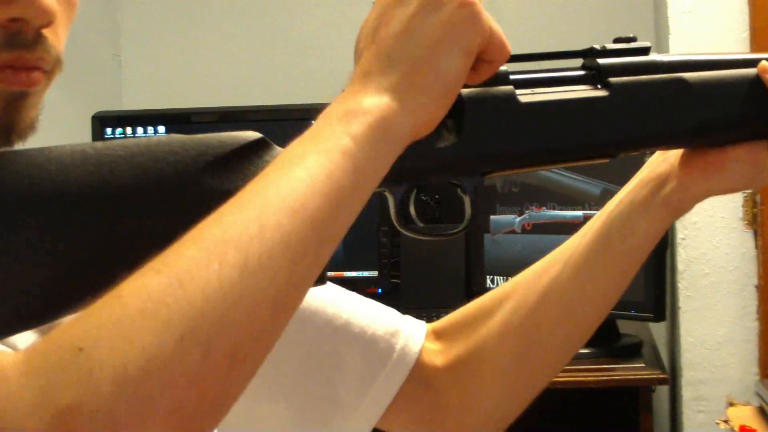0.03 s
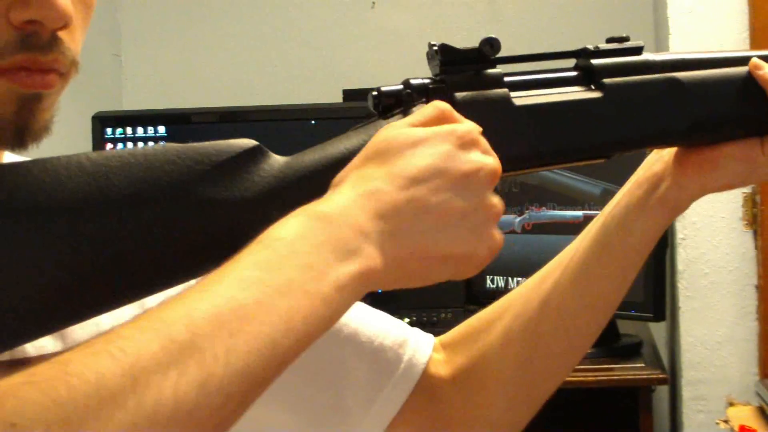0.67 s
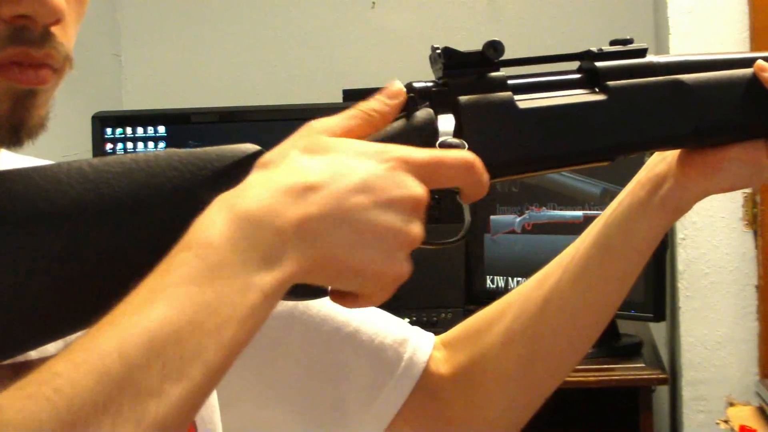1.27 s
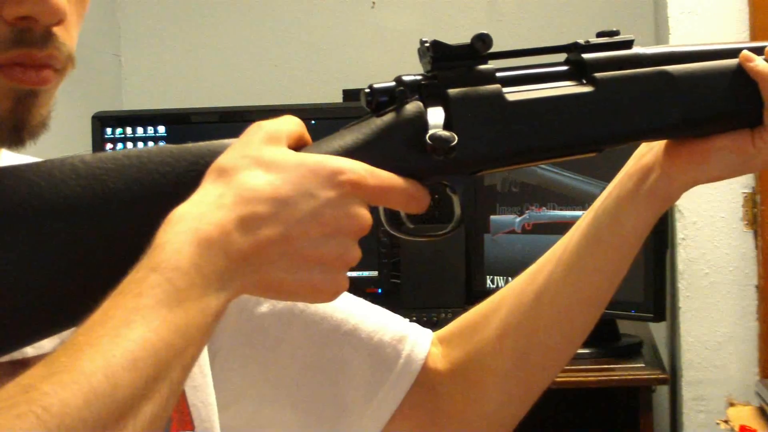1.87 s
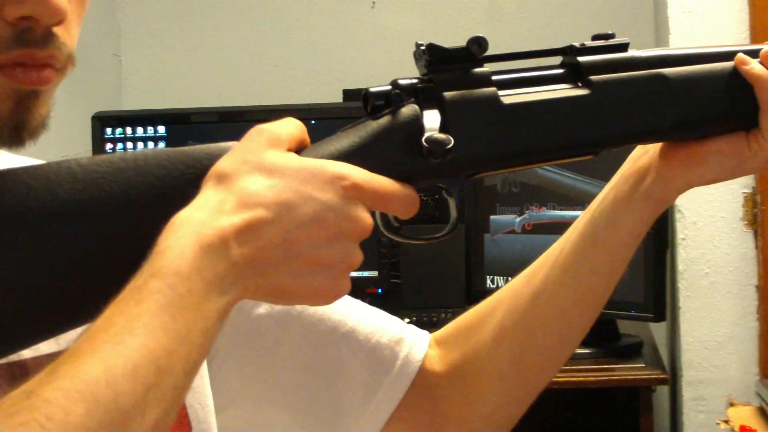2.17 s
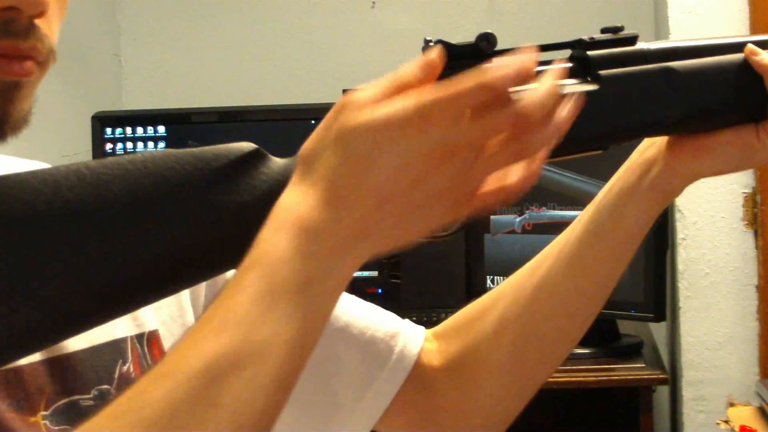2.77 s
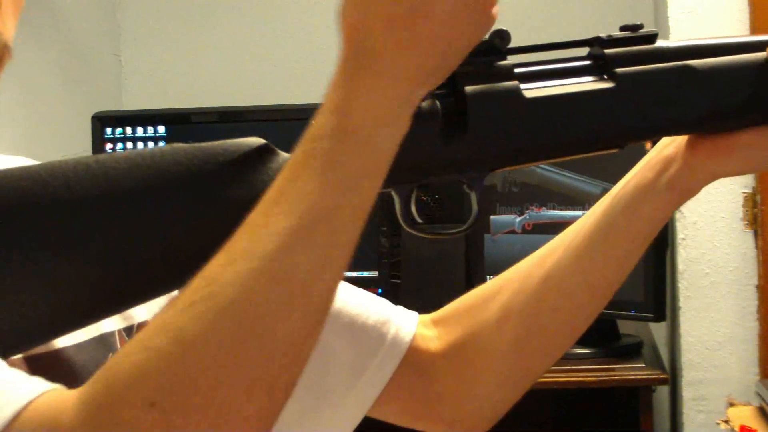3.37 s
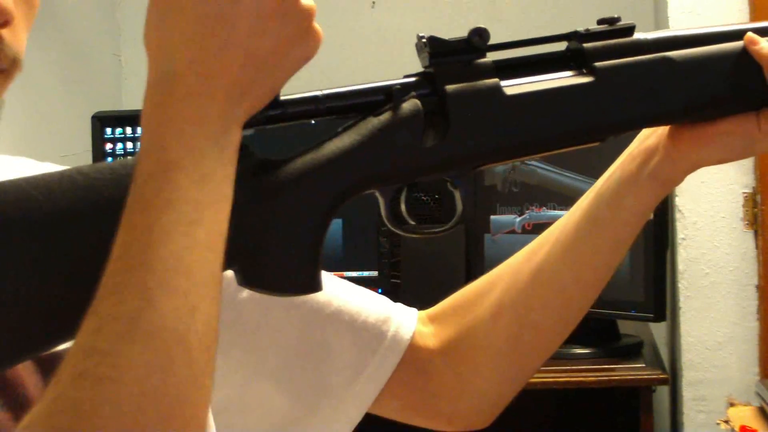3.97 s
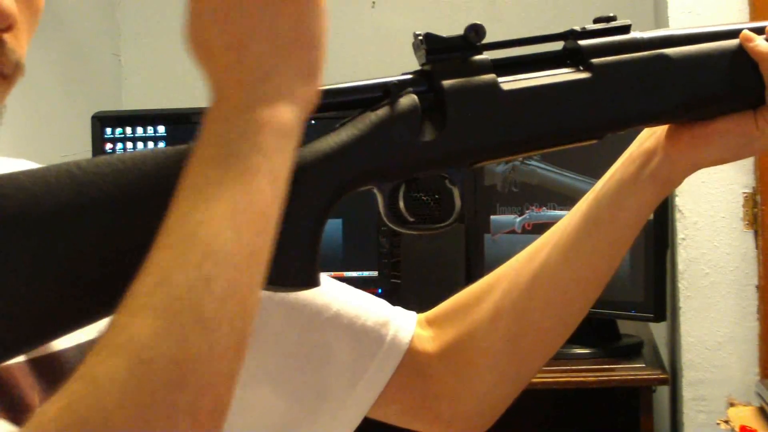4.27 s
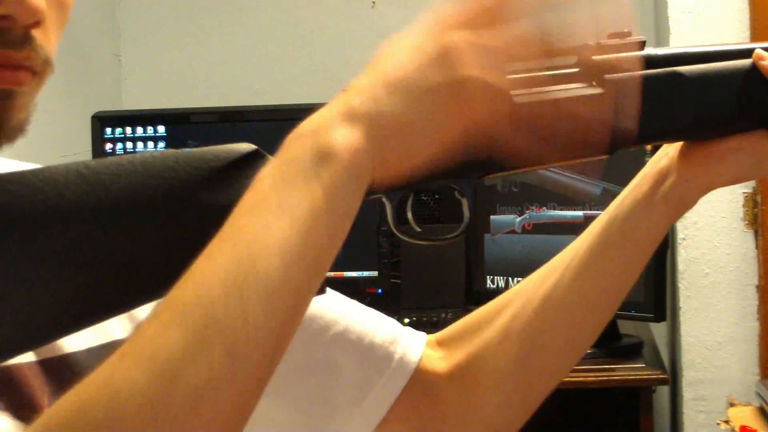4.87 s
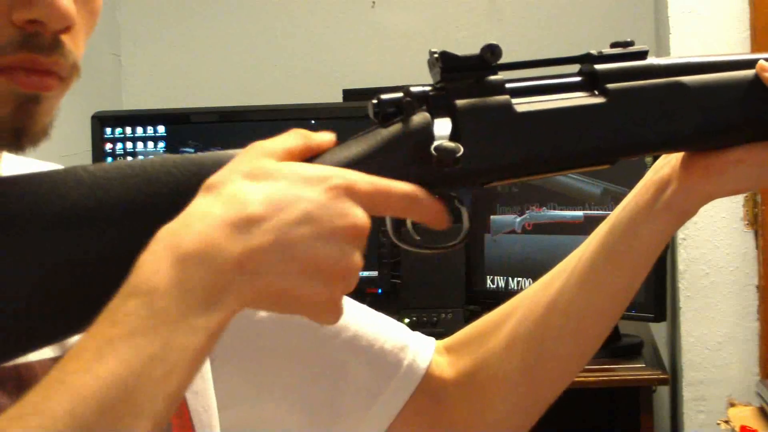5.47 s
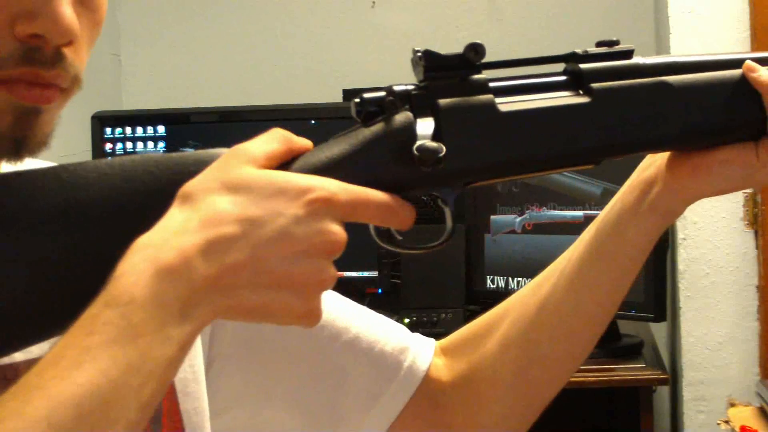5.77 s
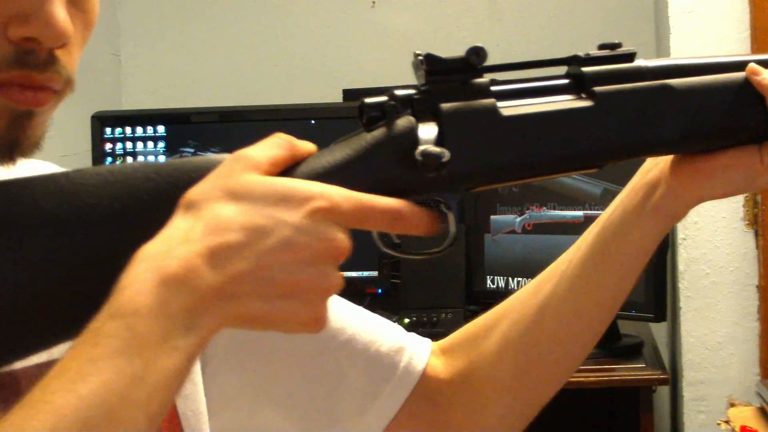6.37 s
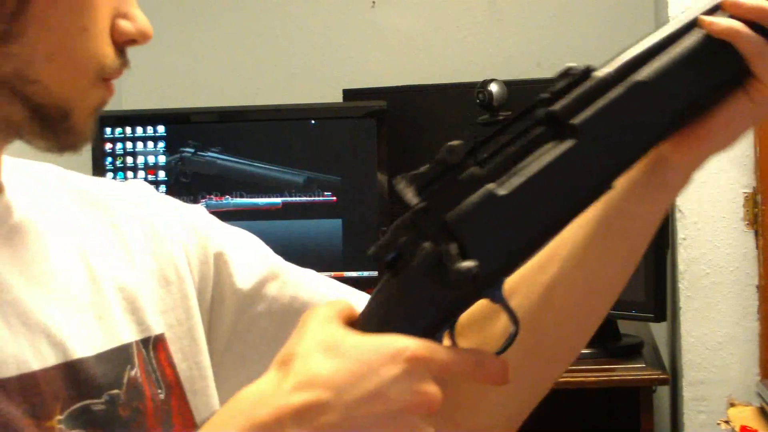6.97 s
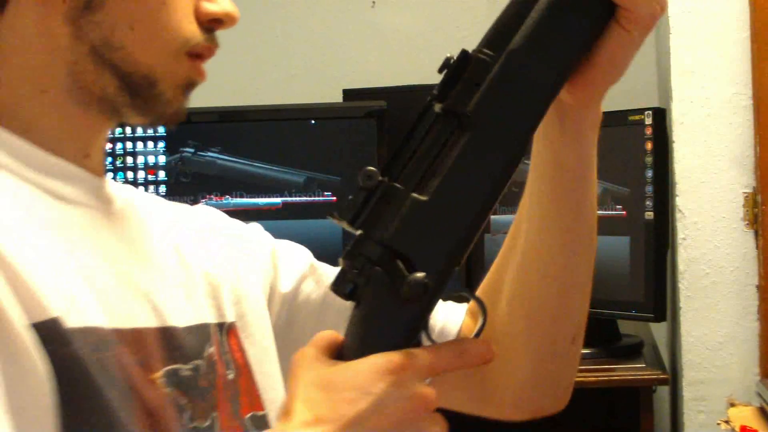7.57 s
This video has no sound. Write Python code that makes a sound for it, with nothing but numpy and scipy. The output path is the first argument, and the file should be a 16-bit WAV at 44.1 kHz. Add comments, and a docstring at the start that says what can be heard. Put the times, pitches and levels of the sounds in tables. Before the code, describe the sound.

In a small room with close walls, a toy rifle is cocked and dry-fired twice. Each time the bolt scrapes briefly and clacks against its stops, loose parts tick, and after a short wait the piston snaps home. A soft low thud comes near the end. Every hit rings briefly over a steady low fan rush and hum, and the microphone cuts off the highest treble.

```python
"""A bolt-action airsoft rifle, cocked and dry-fired twice in a small room with close walls.
The bolt slides and clacks, the sear slips and the piston snaps home; loose parts tick in between.
Each contact sets off ringing tones of the rifle and the room. Near the end the stock bumps softly.
A fan and mains hum lie underneath, all heard through one narrow-band microphone
whose limiter ducks after each hard hit."""
import sys
import numpy as np
from scipy import signal
from scipy.fft import rfft, irfft, next_fast_len
from scipy.io import wavfile
from scipy.ndimage import uniform_filter1d

SR = 44100
rng = np.random.default_rng(int(sys.argv[2]) if len(sys.argv) > 2 else 0)


def waveform_to_disk(signal):
    """Save audio, clipped to [-1, 1], as 16-bit WAV at the path in sys.argv[1]."""
    frames = np.transpose(np.atleast_2d(signal))
    scaled = np.clip(frames, -1, 1) * 32767
    samples = np.round(scaled).astype(np.int16)
    wavfile.write(sys.argv[1], SR, samples)


N = 340893
TIME = np.arange(N) / SR

# The bolt hitting its stops. Each row: start in seconds, level in dB, knock (lows) in dB,
# brightness (highs) in dB, chatter decay in seconds, the part's own pitch in Hz, its lift in dB.
BOLT_CLACKS = [(0.001, -10.5, -1.5, 2, 0.003, 1720, 4.5), (0.0328, 1.5, -5, -2, 0.0019, 2880, 4.5),
               (0.099, -5.5, -6.5, -6.5, 0.0075, 486, 6), (0.5274, -4.5, -2.5, -10.5, 0.0025, 1600, 3.5),
               (0.6119, 1, -3.5, -0.5, 0.003, 490, 10.5), (3.3059, -4.5, -1, 2, 0.0039, 1690, 2.5),
               (3.634, -4.5, 2.5, -2, .0018, 2680, 8.5), (3.722, -3.5, -4, 2, 0.0029, 1720, 7.5),
               (3.8361, -2.5, -2, 0.5, 0.0036, 1210, 3.5), (4.5262, -7.5, -3, -2, 0.0061, 1140, 5.5),
               (5.0613, -1.5, 0.5, 0.5, 0.0014, 1460, 5)]
def bolt_clacks(rebound_s=0.01, loss_db=16.5, dull_db=8.5, chatter_s=0.0046, part_hz=1300, lift_db=7):
    """The bolt hits its stop, then settles with a weaker, duller rebound."""
    rebounds = [(start + rebound_s, db - loss_db, knock, bright - dull_db, chatter_s, part_hz, lift_db)
                for start, db, knock, bright, *_ in BOLT_CLACKS]
    return list(BOLT_CLACKS) + rebounds


# The trigger pulls. Each row: start in seconds, level in dB, knock in dB, brightness in dB.
DRY_SHOTS = [(2.174, 3.5, -5, 6.5), (6.2062, 3, -13.5, 7)]
def dry_shots(lead_s=0.0048, sear_under_db=24.5, sear_knock_db=5):
    """The sear slips with a small click, then the piston snaps home."""
    part = (0.0028, 4600, 2.5)   # chatter decay in seconds, pitch in Hz, lift in dB
    sears = [(start - lead_s, db - sear_under_db, sear_knock_db, 0, *part) for start, db, *_ in DRY_SHOTS]
    pistons = [(*shot, *part) for shot in DRY_SHOTS]
    return sears + pistons


# Light touches on the rifle. Each row: start in seconds, level in dB, hardness as dB of treble,
# chatter decay in seconds, the part's own pitch in Hz.
PART_TOUCHES = [(0.077, -14, -7, 0.0041, 1000), (0.521, -24.5, -3, 0.0088, 6000),
                (0.595, -22, -7, .0013, 2000), (0.62, -12, 2.5, 0.0066, 2750),
                (0.644, -16.5, -1, 0.0092, 1410), (3.048, -30, -16, 0.016, 600),
                (3.161, -31, 2.5, 0.005, 1100), (3.269, -28, -24, 0.0047, 1700),
                (3.283, -20.5, -16, 0.0071, 1840), (3.418, -30, -2, 0.0027, 1800),
                (3.5509, -17.5, 6, 0.0093, 4050), (3.619, -19, 2, 0.0039, 2700),
                (3.748, -12.5, -5, 0.0062, 490), (4.443, -20, -6, .0081, 980),
                (4.594, -22.5, 4.5, 0.0024, 3320), (4.9185, -18, -12.5, 0.0071, 950),
                (5.041, -18.5, -13, .0018, 1540), (6.446, -34.5, -1, 0.0032, 2610),
                (7.543, -44.5, 23, 0.0088, 4170)]
def loose_parts(knock_db=-1.5, knock_per_hardness=0.36, lift_db=6):
    """Loose parts meet lightly: hard touches tick, soft ones knock."""
    return [(start, db, knock_db - knock_per_hardness * hardness, hardness, chatter_s, hz, lift_db)
            for start, db, hardness, chatter_s, hz in PART_TOUCHES]


def impact(chatter_s, lead_in_db=-15.0, lead_in_s=0.0024, size=4096):
    """A faint, brief swell of noise leads into a click of micro-impacts that excite all pitches evenly."""
    envelope = np.exp(-TIME[:size] / chatter_s)
    chatter = rng.standard_normal(size) * envelope
    for _ in range(4):   # flatten the spectrum while keeping the burst short
        spectrum = rfft(chatter)
        chatter = irfft(spectrum / (np.abs(spectrum) + 1e-12)) * envelope ** (1 / 8)
    click = rms_one(chatter) * np.sqrt(np.mean(envelope ** 2))
    lead_in = from_db(lead_in_db) * rng.standard_normal(size) * np.exp(-(TIME[:size] / lead_in_s) ** 2)
    return np.concatenate([lead_in[::-1], click])   # the click starts at the midpoint


def contacts(events, knock_hz=1200, bright_hz=3500, part_q=5.1):
    """Heavy parts knock, light ones tick; each adds its own short resonance and echoes off the walls."""
    force = np.zeros(N + 2 * SR)   # a spare second at each end
    for start, level_db, knock_db, bright_db, chatter_s, part_hz, lift_db in events:
        low, rest = split(impact(chatter_s), knock_hz)
        mid, high = split(rest, bright_hz)
        click = from_db(knock_db) * low + mid + from_db(bright_db) * high
        click = click + (from_db(lift_db) - 1) * resonance(click, part_hz, part_hz / part_q)
        heard = from_db(level_db) * room(click)
        at = SR + round(start * SR) - len(click) // 2
        force[at:at + len(heard)] += heard
    return force[SR:SR + N]


# The bolt's strokes. Each row: time of full speed in seconds, stop in seconds, friction in dB.
BOLT_STROKES = [(0, 0.095, -26), (3.272, 3.307, -46), (3.61, 3.78, -32.5), (3.801, 3.826, -31),
                (4.464, 4.577, -28.5), (4.915, 4.93, -43.5)]
def stroke_friction_db(swell_db_per_s=328, sag_db_per_s=64, stop_db_per_s=901):
    """Each stroke swells as the bolt gathers speed, sags as it travels and dies when it stops."""
    strokes = []
    for full, stop, db in BOLT_STROKES:
        swell = swell_db_per_s * np.maximum(full - TIME, 0)
        sag = sag_db_per_s * np.maximum(TIME - full, 0)
        halt = stop_db_per_s * np.maximum(TIME - stop, 0)
        strokes.append(db - swell - sag - halt)
    return np.max(strokes, axis=0)


def bolt_slide(slips_per_s=2500, spread_db=5.0, dull_hz=5500, thin_hz=750, tube_db=-14):
    """Friction is a dense run of tiny slips of uneven size, which make the bolt's tube sing."""
    sizes = rng.choice([-1, 1], N) * from_db(spread_db * rng.uniform(-0.63, 1, N))
    slips = (rng.random(N) < slips_per_s / SR) * sizes
    scrape = rms_one(butter(slips, dull_hz, "low", order=1))
    scrape = butter(scrape, thin_hz, "high")
    friction_db = stroke_friction_db()
    # the tube follows only part of the friction's swing, so a light rub mostly sings
    tube_drive = scrape * from_db(tube_db + 0.6 * friction_db)
    return scrape * from_db(friction_db) + resonance(tube_drive, hz=1030, width_hz=120)


# The colour of a contact. Each row: frequency in Hz, gain in dB.
CONTACT_COLOUR = [(100, -19.5), (250, -5), (380, -4), (490, 1), (620, -1.5), (1000, 4), (1700, 4.5),
                  (2600, 2.5), (3500, -0.5), (5000, 0), (6500, 0), (7500, -14)]
# Ringing tones of the rifle and the room. Each row: pitch in Hz, relative level in dB, t60 in seconds.
RINGING_TONES = [(510, -6.5, 0.036), (765, -8, 0.14), (892, -6, 0.065), (950, -1, 0.11), (1027, 1.5, 0.14),
                 (1225, -0.5, .22), (1286, -5, 0.21), (1406, -2, 0.25), (1590, -5.5, 0.22),
                 (1725, -4.5, 0.084), (1924, -7.5, 0.14), (1920, -5.5, 0.15), (2165, -10.5, 0.32),
                 (2540, -14, 0.11), (2608, -6.5, 0.03), (2880, -16.5, .12), (3590, -7, 0.064),
                 (4360, -13.5, .12), (4770, -7, 0.073), (5700, -9, 0.1), (6500, -11.5, .2)]
def crack_and_ring(force, direct_db=4.0, ring_db=7.5):
    """Every contact radiates as a crack and sets off ringing tones of the rifle and the small room."""
    crack = colour(force, CONTACT_COLOUR)
    tones = sum(from_db(db) * resonance(crack, hz, width_hz=np.log(1000) / (np.pi * t60))
                for hz, db, t60 in RINGING_TONES)
    return from_db(direct_db) * crack + from_db(ring_db) * tones


def bolt_handle(level_db=-14):
    """The handle rings as the bolt is first slammed shut."""
    return from_db(level_db) * ring(start=0.613, hz=6455, t60=0.21)


# The stock's bumps. Each row: start in seconds, level in dB, pitch in Hz, t60 in seconds.
STOCK_BUMPS = [(7.0985, -22, 280, 0.097), (7.098, -21, 200, 0.044), (7.1335, -24, 127, .1)]
def stock_bumps():
    """The stock meets the shooter's body with soft, low thuds."""
    return sum(from_db(db) * ring(start, hz, t60) for start, db, hz, t60 in STOCK_BUMPS)


def room(x, echo_db=-3, wall_delay_s=0.005, low_t60=0.26, high_t60=0.27, early_db=11.5, early_s=0.0041):
    """A thin direct crack, then the close walls; their echo pattern is new each time, as the rifle moves."""
    age = TIME[:SR // 3]
    scatter = butter(rng.standard_normal(len(age)), 200, "high")
    low, high = split(scatter, hz=3500)
    tail = low * from_db(-60 * age / low_t60) + high * from_db(-60 * age / high_t60)
    early_lift = 1 + from_db(early_db) * np.exp(-age / early_s)
    echoes = tail * early_lift * (age > wall_delay_s)
    body, crack = split(signal.unit_impulse(len(age)), hz=1400)
    direct = from_db(-2.0) * body + crack
    return signal.fftconvolve(x, direct + from_db(echo_db) * echoes / np.linalg.norm(echoes))


# The fan's air noise in the room. Each row: frequency in Hz, relative spectral level in dB.
FAN_SPECTRUM = [(12, -32), (20, 3.5), (65, -2.5), (87, -3), (109, -9), (210, -4.5), (244, -9), (361, -9),
                (388, -16), (439, -11), (508, -15), (1110, -16), (1530, -20.5), (5900, -25), (7000, -27.5),
                (9100, -96), (15400, -120)]
def fan(level_db=-38, top_hz=7250):
    """Moving air makes a smooth, low rush."""
    air = colour(rng.standard_normal(N), FAN_SPECTRUM)
    return from_db(level_db) * rms_one(butter(air, top_hz, "low", order=8))


# Hum lines in the room tone. Each row: pitch in Hz, rms level in dB.
HUM_LINES = [(60, -50), (120, -50.5), (220, -52.5), (298, -59.5), (445, -55)]
def hum(waver_rad=0.38, waver_hz=4.7):
    """The mains and the fan motor hum in slightly unsteady tones."""
    tones = np.zeros(N)
    for hz, db in HUM_LINES:
        phase = 2 * np.pi * (hz * TIME + rng.random())
        waver = waver_rad * rms_one(butter(rng.standard_normal(N), waver_hz, "low"))
        tones += np.sqrt(2) * from_db(db) * np.sin(phase + waver)
    return tones


def from_db(db):
    """Decibels to gain."""
    return 10 ** (np.asarray(db) / 20)


def rms_one(x):
    """Scale to rms 1."""
    return x / np.sqrt(np.mean(x ** 2) + 1e-20)


def butter(x, hz, kind, order=2):
    """Causal Butterworth filter."""
    return signal.sosfilt(signal.butter(order, hz, kind, fs=SR, output="sos"), x + 1e-18)


def split(x, hz):
    """Lows and highs that add up flat."""
    return [butter(butter(x, hz, kind), hz, kind) for kind in ("low", "high")]


def colour(x, spectrum):
    """Causal (minimum-phase) filter that follows rows of frequency in Hz and gain in dB."""
    size = 2 * next_fast_len(N)
    hz, db = np.transpose(spectrum)
    bins = np.maximum(np.arange(size // 2 + 1) * SR / size, 1)
    gain = from_db(np.interp(np.log(bins), np.log(hz), db))
    cepstrum = irfft(np.log(gain))
    cepstrum[1:size // 2] *= 2
    cepstrum[size // 2 + 1:] = 0
    return irfft(rfft(x, size) * np.exp(rfft(cepstrum)))[:N]


def resonance(x, hz, width_hz):
    """Two-pole resonance, gain 1 at its peak."""
    r = np.exp(-np.pi * width_hz / SR)
    return signal.lfilter([1 - r, 0, r - 1], [1, -2 * r * np.cos(2 * np.pi * hz / SR), r * r], x + 1e-18)


def ring(start, hz, t60):
    """A sine of height 1 that dies away from its start, by 60 dB in t60 seconds."""
    age = np.maximum(TIME - start, 0)
    return np.sin(2 * np.pi * hz * age) * from_db(-60 * np.minimum(age / t60, 2))


def scene():
    """The rifle in its small room, over the fan and the hum, in mono."""
    hits = contacts(bolt_clacks() + dry_shots() + loose_parts())
    slides = room(bolt_slide())[:N]
    handling = crack_and_ring(hits + slides) + bolt_handle() + stock_bumps()
    return (handling + fan() + hum())[None]


def limiter(x, threshold_db=-2.0, release_db_per_s=113.0, treble_db=9.5, treble_hz=4500):
    """The gain drops at once on a loud hit, most on a bright one, and climbs back steadily."""
    treble = from_db(treble_db) * butter(x, treble_hz, "high")
    power = uniform_filter1d(x ** 2 + treble ** 2, size=128)
    over_db = np.maximum(10 * np.log10(np.maximum(power, 1e-12)) - threshold_db, 0)
    recovery_db = release_db_per_s * TIME
    duck_db = np.maximum.accumulate(over_db + recovery_db) - recovery_db
    return x * from_db(-uniform_filter1d(duck_db, size=96))


def record(dry, cutoff_hz=7250):
    """One speech-band microphone with a limiter; the highest peaks are rounded off."""
    narrow = butter(dry[0], cutoff_hz, "low", order=8)
    rounded = np.tanh(limiter(narrow))
    band_edge = signal.ellip(8, 0.2, 80, cutoff_hz, fs=SR, output="sos")
    return signal.sosfilt(band_edge, rounded)[None]


dry = scene()
out = record(dry)
waveform_to_disk(out)
```